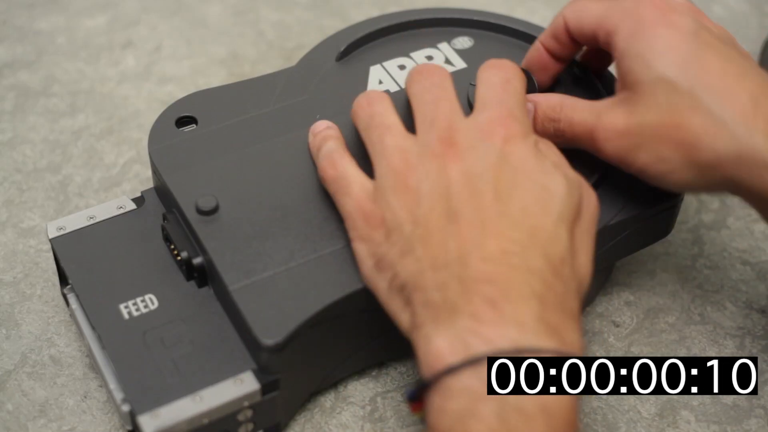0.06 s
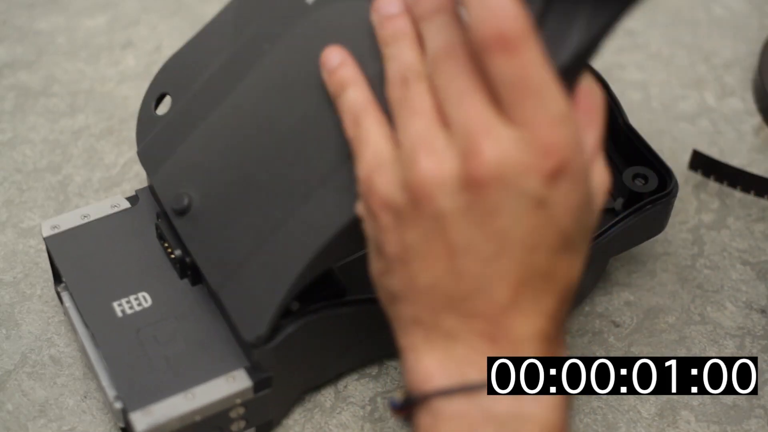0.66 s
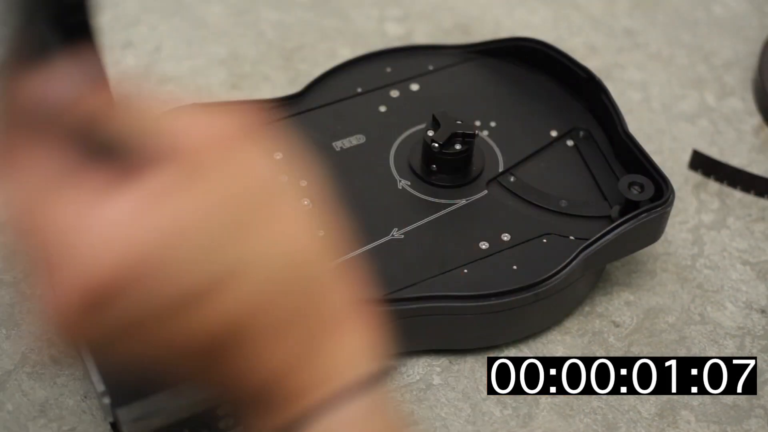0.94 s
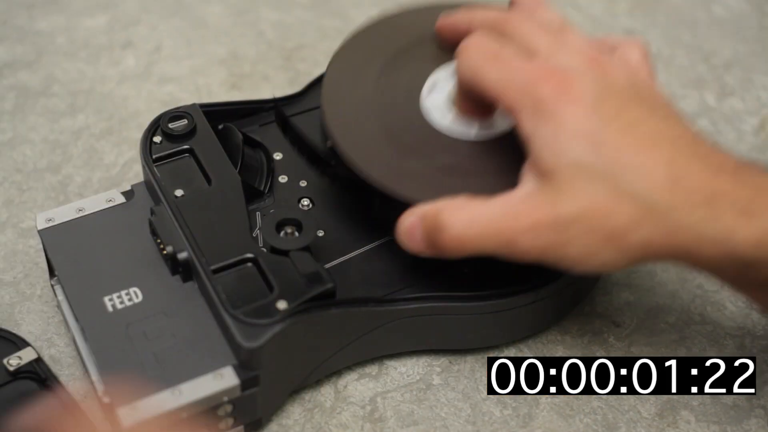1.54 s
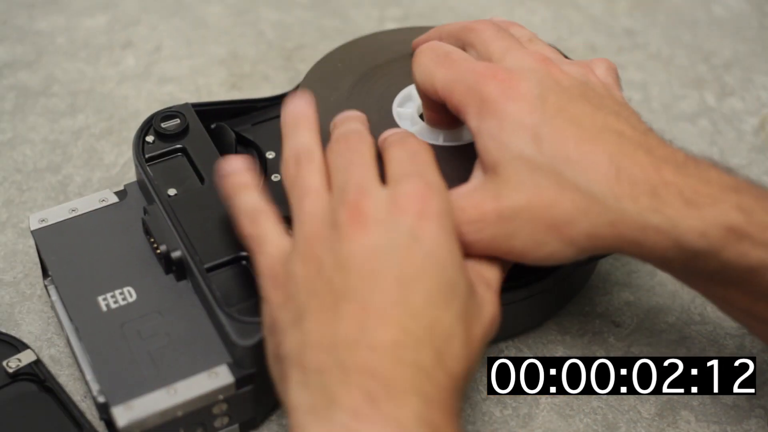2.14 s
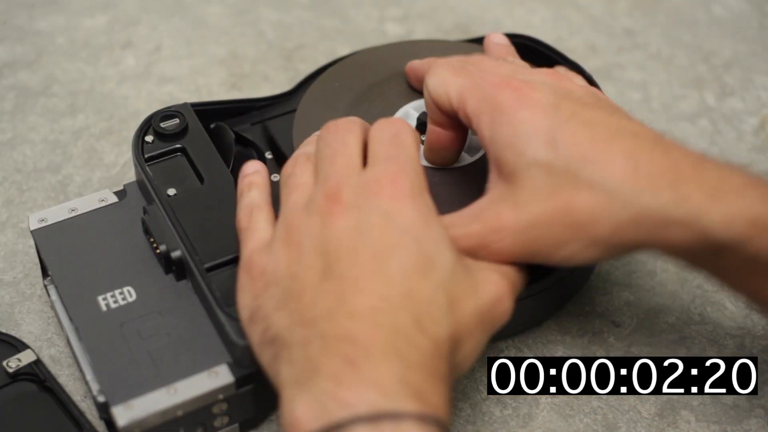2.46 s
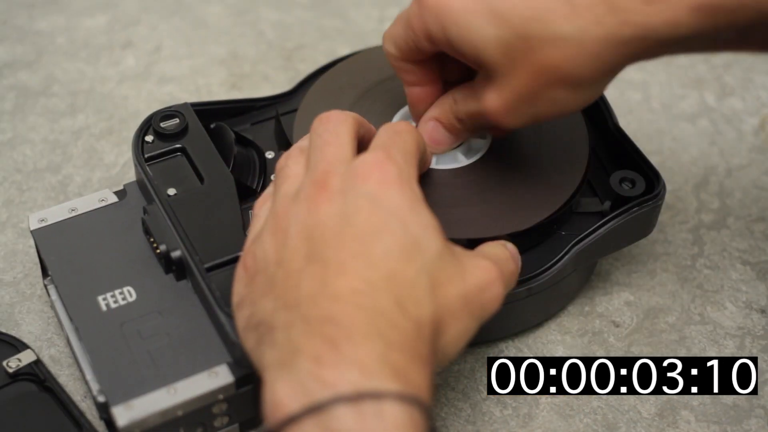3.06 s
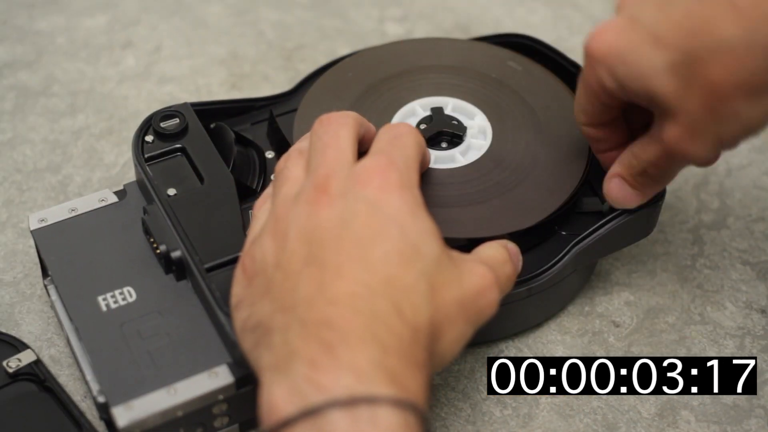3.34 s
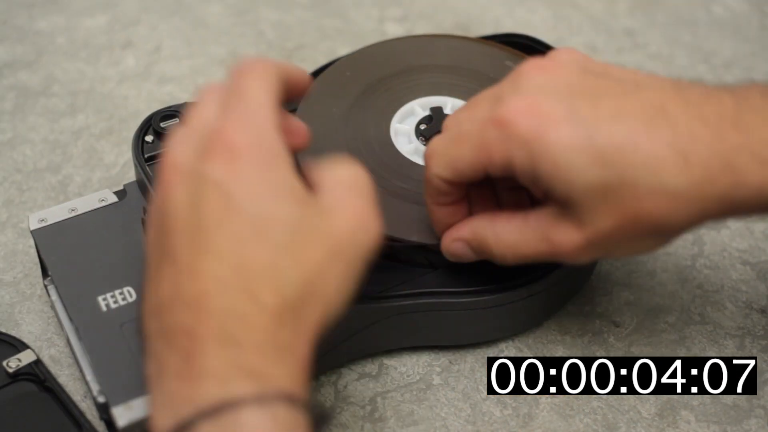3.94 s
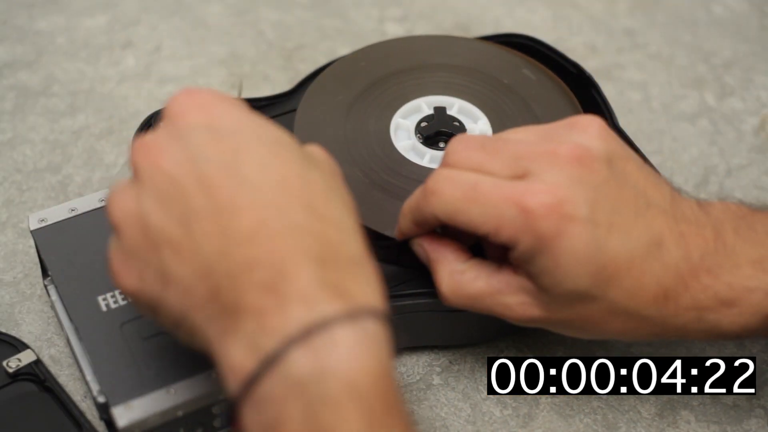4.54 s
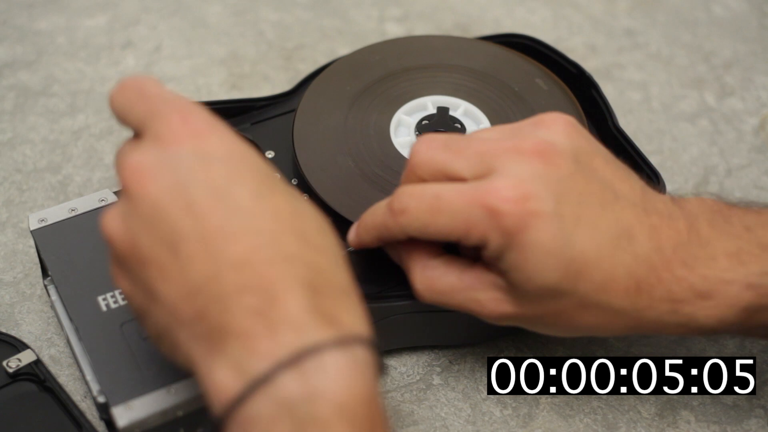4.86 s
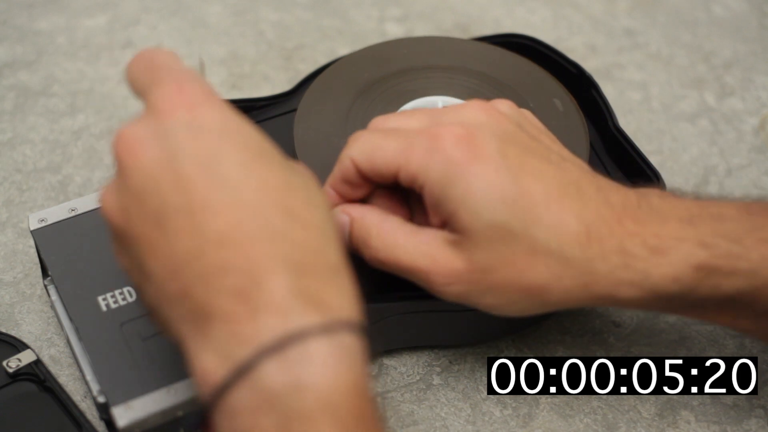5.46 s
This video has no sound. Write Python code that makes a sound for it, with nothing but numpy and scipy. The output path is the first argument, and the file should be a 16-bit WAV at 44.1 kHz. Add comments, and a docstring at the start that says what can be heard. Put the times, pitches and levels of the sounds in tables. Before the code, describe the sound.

Hands load a film magazine on a table in a bare, echoing room, close to the microphone. A small latch clicks, then the lid clatters down loudly. A film roll bumps the hollow case and knocks into place on its spindle. A little metal lock pings, and the stiff film end flicks and snaps against the case. Soft rubbing and light ticks run between, ending with a tiny squeak and a click.

```python
"""Loading a film magazine

Hands at a table in a bare, live room, close to one microphone. A latch clicks, the lid clatters down,
a film roll knocks into the case and seats on its spindle, the core lock pings and the stiff film end
snaps into its guide. Each blow is a burst of chatter plus the ringing modes of the part; between blows,
skin and film rub by stick and slip. The loudest blows overload the input."""
import sys
import numpy as np
from scipy import signal
from scipy.io import wavfile
from scipy.ndimage import uniform_filter1d

SR = 44100
rng = np.random.default_rng(int(sys.argv[2]) if len(sys.argv) > 2 else 0)


def int16_out(signal):
    """Quantize to a 16-bit WAV file."""
    q = np.round(np.clip(np.atleast_2d(signal).T, -1, 1) * 32767)
    wavfile.write(sys.argv[1], SR, q.astype(np.int16))


N = 246959
SPRING_HZ = 12288  # the latch spring's ring
# limits of a contact's five registers, thud, knock, clack, click and edge (frequency [Hz])
REGISTERS_HZ = [70, 300, 1000, 3000, 8000, 16000]


def lid():
    """The catch springs open, then the lid clatters on the table."""
    # blows (time [s], level [dB], brightness [dB/octave], nominal length [s], ring [dB])
    latch_hits = [(.2239, -29, 0, 0.0072, -19)]
    lid_hits = [(1.2711, -8, 1, .015, -23), (1.3526, -12, 2, 0.034, -14), (1.3831, -12, -0.9, .014, -6.5),
                (1.3965, -12.5, -0.7, 0.023, -15), (1.4505, -20, -3, 0.051, -21.5)]
    # modes (frequency [Hz], level [dB], t60 [s])
    latch_modes = [(4400, -5.5, 0.019), (5800, -5, 0.0064), (7600, 3, 0.0065), (8300, 0, .008),
                   (8230, -19, 0.17), (SPRING_HZ, -16, 0.17)]
    lid_modes = [(998, -9, 0.14), (1076, -6.5, .06), (1123, -6, .05), (1643, -2, 0.026), (1733, -1, 0.087),
                 (1867, -5, .033), (2090, -9, .055), (4350, -2, .006), (5050, -1, .007)]
    return (struck(latch_hits, latch_modes, registers_db=[-26.5, -22.5, -14, -0.5, -3.5])
            + struck(lid_hits, lid_modes, registers_db=[-19, -9.5, -1, -6.5, -23.5]))


def film_roll():
    """The roll bumps the hollow case; its plastic core ticks on the spindle, works down and seats."""
    # blows (time [s], level [dB], brightness [dB/octave], nominal length [s], ring [dB])
    case_hits = [(1.6068, -20, 1, 0.021, -23), (1.6775, -26.5, -3, 0.025, -33.5)]
    core_hits = [(1.8761, -29, -0.68, 0.02, -12.5), (1.8788, -34.5, -1.4, .012, -16.5),
                 (2.149, -42.5, -1.1, .026, -31), (2.2638, -38, 1, .005, -48),
                 (2.6361, -29, 2.1, .013, -53)]
    spindle_hits = [(2.1198, -32, -2.4, .041, -34), (2.3048, -32, -2.7, 0.046, -38.5),
                    (2.4017, -17.5, 1.3, 0.023, -21.5)]
    # modes (frequency [Hz], level [dB], t60 [s])
    case_modes = [(129.4, -5.5, 0.37), (147, -8.5, 0.42), (188, -4.5, 0.25), (349, 3.5, 0.0523),
                  (534, 1, 0.076), (610, -1, 0.05), (1285, 6, 0.053), (1510, 0.5, 0.05)]
    core_modes = [(4670, -4, 0.0045), (5790, 0, .0035), (6590, 2.5, 0.0036), (7330, 6, 0.0037),
                  (7740, 5, 0.0047)]
    spindle_modes = [(92.7, -5, 0.28), (189, -4, 0.17), (366.7, -13, 0.037), (513, -24, 0.039),
                     (807, 3.5, 0.076), (1155.7, 4, 0.041), (1271, 8, 0.044), (1588, -2, 0.016),
                     (6030, 2.5, 0.023)]
    return (struck(case_hits, case_modes, registers_db=[-18, -0.5, -1, -7, -14.5])
            + struck(core_hits, core_modes, registers_db=[-17, -17, -11, -0.5, -17.5])
            + struck(spindle_hits, spindle_modes, registers_db=[-12, -4.5, 0, -2, -15]))


def film_end():
    """The stiff film end flicks the wall of the case, snaps, and taps the guide with its tip."""
    # blows (time [s], level [dB], brightness [dB/octave], nominal length [s], ring [dB])
    wall_hits = [(3.5244, -26, 3.5, 0.016, -25), (3.5354, -25, -.5, 0.017, -27),
                 (3.6459, -44, -4.5, 0.02, -35)]
    snaps = [(4.0234, -19, 0.68, 0.018, -12.5), (4.311, -43.5, -1.1, 0.011, -40.5),
             (5.5666, -35, -1.4, 0.015, -35), (5.5882, -29, 1, 0.031, -54)]
    guide_hits = [(4.7545, -55, -4.5, 0.02, -41.5), (5.5215, -51, -4, 0.017, -49),
                  (5.5623, -33.5, 4, 0.038, -32.5)]
    # modes (frequency [Hz], level [dB], t60 [s])
    wall_modes = [(506, -10, 0.062), (640, -8, 0.028), (778, -4.5, 0.029), (1970, 1.5, 0.023),
                  (7150, 11.5, 0.0032), (8800, 3, .004)]
    film_modes = [(1488, -11, 0.031), (1627, 0, 0.015), (2480, -6, .01), (6340, 11, 0.005),
                  (7130, 8, 0.0021), (9220, 6, 0.0043)]
    guide_modes = [(1910, -2, 0.028), (2290, 3, 0.036), (2500, -5, 0.019), (3844, -6.5, .012)]
    return (struck(wall_hits, wall_modes, registers_db=[-27, -16, -10.5, 0, -8])
            + struck(snaps, film_modes, registers_db=[-36, -26.5, -12.5, -1.5, 1])
            + struck(guide_hits, guide_modes, registers_db=[-30, -26, -12, -0.5, -14]))


def core_lock():
    """The small metal lock flips over and pings."""
    # blows (time [s], level [dB], brightness [dB/octave], nominal length [s], ring [dB])
    hits = [(3.0369, -36.5, -2.6, 0.025, -23), (3.0459, -37.5, -1, .02, -43),
            (3.1055, -42, 3.5, 0.0099, -52), (3.1522, -38, -0.003, 0.027, -45),
            (3.1884, -42, 3.1, 0.013, -42)]
    # modes (frequency [Hz], level [dB], t60 [s])
    modes = [(1995, -6, .04), (2051, 4, 0.089), (2480, -5, 0.028), (4237, -23, .08), (6050, -18, .05),
             (8140, -25, .06), (12110, -8.5, 0.028)]
    return struck(hits, modes, registers_db=[-25.5, -20, -6, -1, -12])


def struck(hits, modes, registers_db, rise_cycles=0.29):
    """A part chatters and rings, each mode starting up or down depending on where it is hit."""
    hz, db, t60 = np.transpose(modes)[:, :, None]
    t = np.arange(SR // 2) / SR
    swell = 1 - np.exp(-hz * t / rise_cycles)
    waves = amp(db - 60 * t / t60) * swell * np.sin(2 * np.pi * hz * t)
    out = contacts(hits, registers_db, rattle=0.91, press=0.012)
    for start, *_, ring_db in hits:
        polarity = np.sign(rng.standard_normal(len(modes)))
        add(out, start, amp(ring_db) * polarity @ waves)
    return out


def contacts(hits, registers_db, rattle, press):
    """Brief chatter whose treble dies first; rattle scales its length, press its rise time."""
    # tone of every contact (frequency [Hz], gain [dB])
    spectrum = [(60, 4.5), (350, -1), (550, 2.5), (800, -2.5), (1200, -2.5), (1800, 1.5), (2600, -5.5),
                (4000, -0.5), (6500, -0.5), (8500, -7), (11000, -8.5), (15000, -21), (17500, -8)]
    starts, db, brightness, length = np.transpose(hits)[:4, :, None]
    length = np.maximum(rattle * length, .002)
    # a harder contact tilts the spectrum upwards about its centre of weight
    octaves = np.log2(np.multiply(REGISTERS_HZ[:-1], REGISTERS_HZ[1:])) / 2
    octaves -= np.average(octaves, weights=amp(registers_db) ** 2)
    t = np.arange(3072) / SR
    chatter = rng.standard_normal((len(hits), len(t))) * (1 - np.exp(-t / (press * length)))
    bursts, out = 0, np.zeros(N)
    for k, (low, high) in enumerate(zip(REGISTERS_HZ, REGISTERS_HZ[1:])):
        t60 = length * (low / 1500) ** -.22
        force = chatter * amp(-60 * t / t60)
        band = signal.sosfilt(signal.butter(4, [low, high], "band", fs=SR, output="sos"), force)
        rms = np.sqrt((band ** 2).sum(1, keepdims=True) / (SR / 100))  # energy spread over 10 ms
        bursts = bursts + amp(db + registers_db[k] + brightness * octaves[k]) * band / rms
    for start, burst in zip(starts[:, 0], bursts):
        add(out, start, burst)
    return colour(out, spectrum)


def light_taps(flesh_hz=11500):
    """Nudges too soft to ring the case, and ticks of nails and film edge; fingers dull their top."""
    # touches (time [s], level [dB], brightness [dB/octave], nominal length [s])
    nudges = [(.1505, -44.5, 1, 0.024), (.3623, -48, 2.5, .045), (.5268, -50, 1.5, .028),
              (.6394, -38, -2.5, .027), (.6698, -44, 1.5, 0.038), (.6909, -38.5, -2, 0.058),
              (.7492, -43.5, -3, 0.034), (.8552, -46, 3.5, 0.014), (.9112, -43, 2.5, 0.016),
              (1.0013, -47.5, 2, .01), (2.1829, -42, -0.5, .029), (2.3109, -35, 2.5, 0.011),
              (2.3917, -30.5, 3, 0.041), (2.5622, -44, 3, .036), (3.6247, -49, 4.5, 0.024),
              (3.8898, -52.5, 4.5, 0.021), (4.462, -54.5, 3, .025)]
    ticks = [(.4189, -45, -4, 0.049), (.4996, -45.5, -5.5, 0.028), (1.034, -45.5, 2, 0.017),
             (1.066, -46.5, -1, 0.037), (1.1392, -34, 4.5, 0.02), (1.1547, -39.5, 6, 0.032),
             (2.2321, -46, 5, 0.017), (2.2896, -37.5, -1, 0.038), (3.171, -55, -3.5, .06),
             (3.437, -39.5, 0.5, 0.014), (4.2652, -46.5, 7, 0.047), (4.3155, -37.5, -1, 0.012),
             (4.7504, -45.5, 10, 0.04), (5.0296, -54, 10, 0.038), (5.1554, -50.5, 1, 0.0137),
             (5.173, -45.5, 5.5, 0.04), (5.2319, -47, 7, 0.0128), (5.2749, -48.5, -0.5, 0.035),
             (5.3559, -55, -4, .042), (5.4273, -51, 2.5, .05)]
    # their registers (thud [dB], knock [dB], clack [dB], click [dB], edge [dB])
    nudge_db = [-4, -0.5, -6.5, -8.5, -21.5]
    tick_db = [-28, -22.5, -11, 0.5, -5.5]
    taps = contacts(nudges, nudge_db, rattle=.8, press=0.045)
    taps += contacts(ticks, tick_db, rattle=.75, press=.06)
    return amp(-1.5) * signal.sosfilt(signal.butter(2, flesh_hz, fs=SR, output="sos"), taps)


def case_shifting():
    """The hollow case rubs with a low rumble as the hands press and shift it."""
    # pushes (time [s], length [s], level [dB])
    pushes = [(0, 0.015, -30), (.08, .11, -44), (.51, 0.038, -38.5), (.66, 0.3, -43), (1.0, 0.047, -38.5),
              (1.12, .06, -50), (1.62, 0.087, -31), (2.13, 0.27, -46.5), (2.405, 0.058, -33.5),
              (3.07, 0.073, -52)]
    # weight of the resting hands, easing once the roll is in (time [s], level [dB])
    resting = [(0, -53), (2.8, -53), (3.4, -55.5), (3.9, -63), (4.5, -61.5), (5.6, -85.5)]
    # the rumble (frequency [Hz], gain [dB])
    spectrum = [(25, -26), (45, -17.5), (62, -4), (82, 2.5), (130, -6), (165, -6), (280, -3), (420, -12.5),
                (600, -21), (900, -19.5), (2000, -28.5), (6000, -59.5)]
    rest = amp(np.interp(np.arange(N) / SR, *np.transpose(resting)))
    weight = np.hypot(gestures(pushes, attack_s=0.011, release_s=.035), rest)
    return weight * rubbing(spectrum, slips_per_s=200, slip_db=2.5, hiss=0.96, patchy_db=1.5)


def sliding(grip_db=-63.5):
    """Skin and film slide over the parts; the gripping fingers never quite stop."""
    # strokes (time [s], length [s], level [dB])
    strokes = [(0, 0.011, -46), (.15, 0.057, -55.5), (.67, .15, -52), (1.05, 0.19, -55),
               (2.12, 0.041, -49.5), (2.33, 0.24, -53.5), (2.95, 0.14, -55), (3.09, 0.051, -45.5),
               (3.45, 0.066, -61), (3.56, 0.086, -54), (3.84, 0.14, -54.5), (4.74, 0.056, -53.5),
               (4.96, 0.056, -64), (5.17, 0.034, -57), (5.55, .05, -50.5)]
    # the scrape (frequency [Hz], gain [dB])
    spectrum = [(100, -11), (600, -5.5), (1700, 1.5), (3000, -1.5), (5000, 4), (8500, -0.5), (11000, -15),
                (15000, -13.5), (18000, -39)]
    speed = np.hypot(gestures(strokes, attack_s=0.017, release_s=0.031), amp(grip_db))
    return speed * rubbing(spectrum, slips_per_s=910, slip_db=3, hiss=0.73, patchy_db=4.5)


def gestures(moves, attack_s, release_s):
    """A gain curve in which each hand movement swells, holds and dies away."""
    t, power = np.arange(N) / SR, 0
    for start, length, db in moves:
        swell = np.clip((t - start) / attack_s, 0, 1)
        fade = np.exp(-np.maximum(t - start - length, 0) / release_s)
        power = power + (amp(db) * swell * fade) ** 2
    return np.sqrt(power)


def rubbing(spectrum, slips_per_s, slip_db, hiss, patchy_db):
    """Friction: tiny slips over a smooth hiss, in patches as the grip changes."""
    slipping = rng.random(N) < slips_per_s / SR
    strength = amp(slip_db * np.minimum(rng.exponential(1, N), 4))
    slips = unit(slipping * strength * rng.choice([-1, 1], N))
    frames = signal.stft(slips + hiss * rng.standard_normal(N), nperseg=256)[2]
    patches = uniform_filter1d(rng.standard_normal(frames.shape), size=16, axis=0)
    patches = unit(uniform_filter1d(patches, size=5, axis=1))
    scrape = signal.istft(frames * amp(patchy_db * patches), nperseg=256)[1][:N]
    return unit(colour(scrape, spectrum))


def squeaks(sag=0.14, jitter=.24, octave_db=-4):
    """The film sticks and slips in its guide: rough tones that sag in pitch as it slows."""
    # squeaks (time [s], length [s], pitch [Hz], level [dB])
    chirps = [(5.4676, 0.0061, 3963, -29.5), (5.473, 0.0064, 4080, -31), (5.48, .004, 3820, -47),
              (5.489, 0.0049, 3760, -37), (5.5, 0.0045, 3950, -42), (5.506, .004, 4080, -45)]
    out = np.zeros(N)
    for start, length, hz, db in chirps:
        progress = np.linspace(0, 1, round(length * SR))
        pitch = hz * (1 + sag * (.5 - progress) + jitter * rng.standard_normal(len(progress)))
        phase = 2 * np.pi * np.cumsum(pitch) / SR
        tone = np.sin(phase) + amp(octave_db) * np.sin(2 * phase)
        add(out, start, amp(db) * np.sin(np.pi * progress) * tone)
    return out


def close_sound(x):
    """The direct sound at the microphone, with first echoes off the table and case."""
    # echoes (delay [s], level [dB])
    echoes = [(.0021, -10), (.0034, -11.5), (.0058, -18.5), (.0087, -15), (0.01, -20), (0.028, -25.5),
              (0.029, -29), (0.041, -23)]
    out = x.copy()
    for delay, db in echoes:
        add(out, delay, amp(db) * rng.choice([-1., 1.]) * x)
    return out


def room(x, build_s=0.02):
    """A dense tail builds up as the bare walls answer; the treble dies first."""
    # decay, floored at 0.05 s below (frequency [Hz], t60 [s])
    decay_times = [(80, -0.5), (210, 1.82), (560, 1.33), (1500, 1.34), (4000, 1.05), (7000, 0.9),
                   (10000, 0.55), (15000, 0.6)]
    # tail against direct sound (frequency [Hz], level [dB])
    spectrum = [(60, 1.5), (170, -2.5), (400, -5), (1000, -8), (1800, -7), (3500, -9), (7000, -10.5),
                (11000, -14), (16000, -21.5)]
    size = 3 * SR // 2
    hz, t, frames = signal.stft(rng.standard_normal(size), SR, nperseg=256)
    t60 = np.maximum(at_hz(decay_times, hz), .05)[:, None]
    decay = amp(-60 * t / t60) * np.sqrt(2 * np.log(1000) / (t60 * SR))  # equal energy per band
    tail = signal.istft(frames * decay, SR, nperseg=256)[1][:size]
    build = np.minimum(np.arange(size) / SR / build_s, 1) ** 2
    return signal.fftconvolve(x, colour(tail * build, spectrum))[:N]


def still_air():
    """Faint, steady room tone."""
    # the air's noise (frequency [Hz], gain [dB])
    spectrum = [(12, -39), (20, 3.5), (61, 5), (184, -2), (325, -2), (543, -9.5), (682, -2), (1210, -19.5),
                (1510, -1.5), (2830, -13.5), (6460, -7.5), (14300, -26), (18000, -50)]
    return amp(-62.5) * unit(colour(rng.standard_normal(N), spectrum))


def amp(db):
    """Decibels to gain."""
    return 10 ** (np.asarray(db) / 20)


def unit(x):
    """Scales to an rms of one."""
    return x / np.sqrt(np.mean(x ** 2) + 1e-20)


def at_hz(points, hz):
    """Reads a curve on a log-frequency axis."""
    knots, values = np.transpose(points)
    return np.interp(np.log(hz + 1), np.log(knots + 1), values)


def add(mix, start_s, sound):
    """Mixes a sound in at a time."""
    part = mix[round(start_s * SR):][:len(sound)]
    part += sound[:len(part)]


def colour(x, spectrum):
    """Causal filter with the given spectrum."""
    log_gain = np.log(amp(at_hz(spectrum, abs(np.fft.fftfreq(4096, 1 / SR)))))
    taps = np.fft.ifft(np.exp(np.conj(signal.hilbert(log_gain)))).real
    return signal.oaconvolve(x, taps)[:len(x)]


def scene(directions=3, left_db=7.6):
    """Blows and rubbing in the room, over still air; one close microphone, louder on the left."""
    friction = amp(-4.5) * case_shifting() + amp(-0.5) * sliding() + squeaks()
    # a struck part sounds different in each direction: one reaches the microphone, all reach the walls
    radiated = [lid() + film_roll() + film_end() + core_lock() + light_taps() + friction
                for _ in range(directions)]
    reverb = sum(room(x) for x in radiated) / np.sqrt(directions)
    mono = close_sound(radiated[0]) + reverb + still_air()
    sides = amp([[left_db], [0]])
    return mono * sides / sides.mean()


def record(dry, ceiling=0.51, cutoff_hz=17900):
    """The input clips flat on the loudest blows; then the microphone's tone and a band limit."""
    # microphone response (frequency [Hz], gain [dB])
    microphone = [(20, -9), (45, 3.5), (70, -2), (13000, 0), (14800, -1.5), (16000, -7), (18000, -16.5)]
    clipped = dry / np.maximum(abs(dry.mean(0)) / ceiling, 1)
    toned = np.array([colour(channel, microphone) for channel in clipped])
    taps = signal.firwin(511, cutoff_hz, window=("kaiser", 9), fs=SR)
    return signal.oaconvolve(toned, taps[None], "same")


dry = scene()
out = record(dry)
int16_out(out)
```